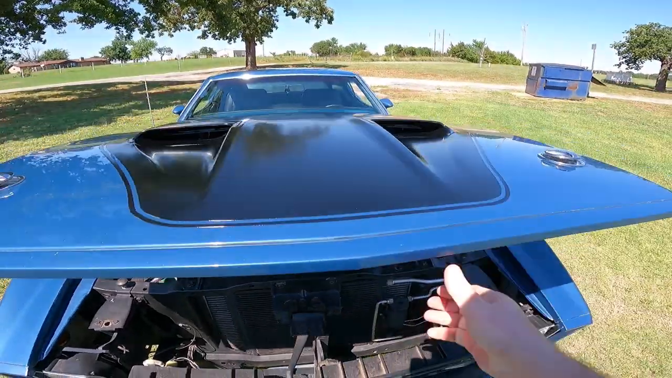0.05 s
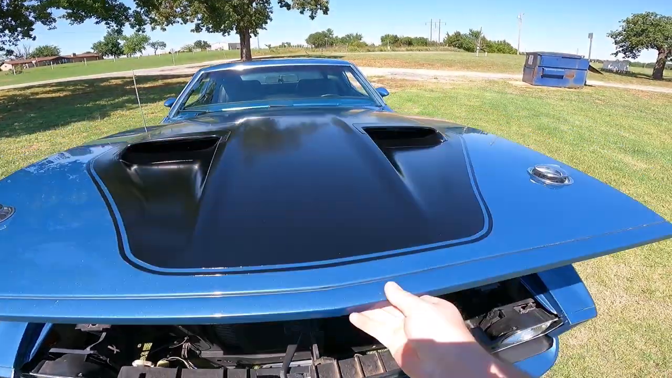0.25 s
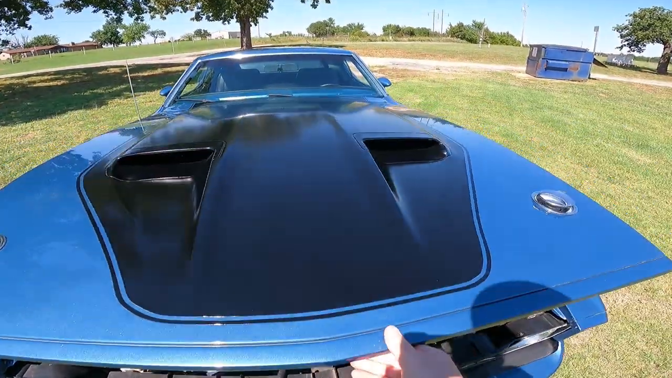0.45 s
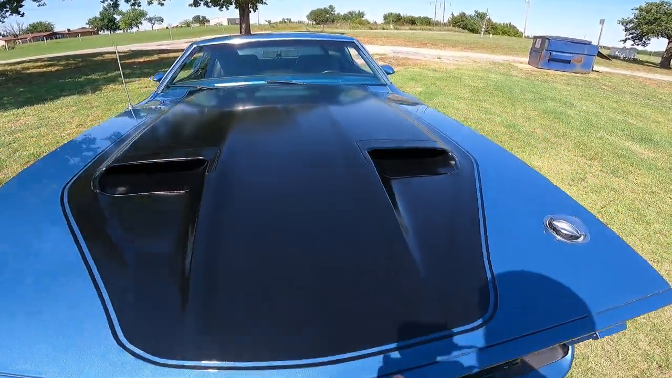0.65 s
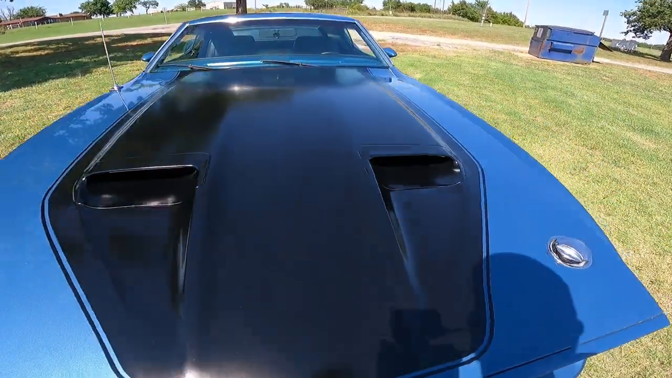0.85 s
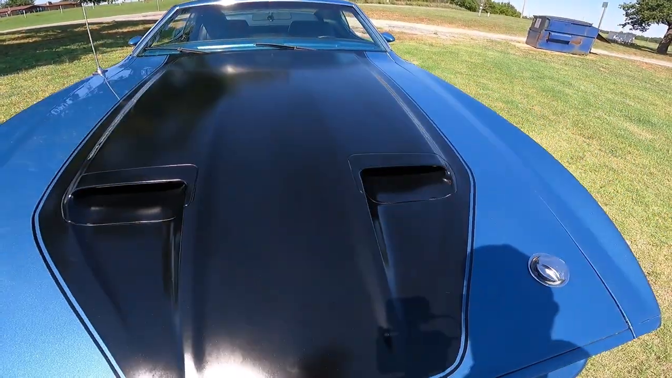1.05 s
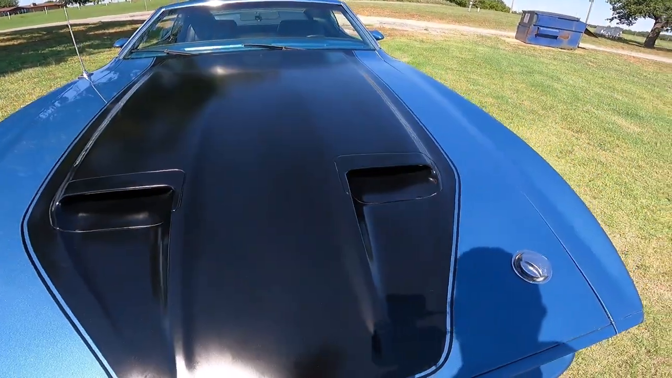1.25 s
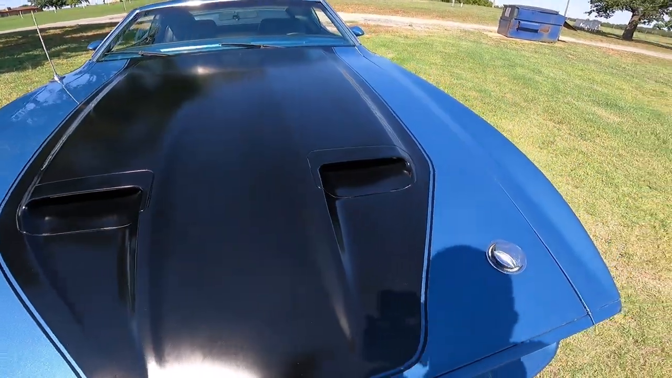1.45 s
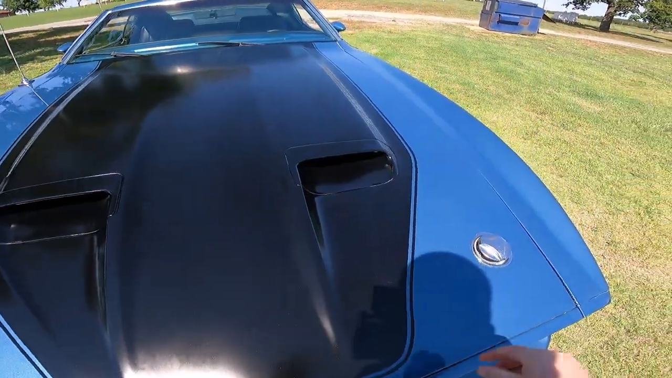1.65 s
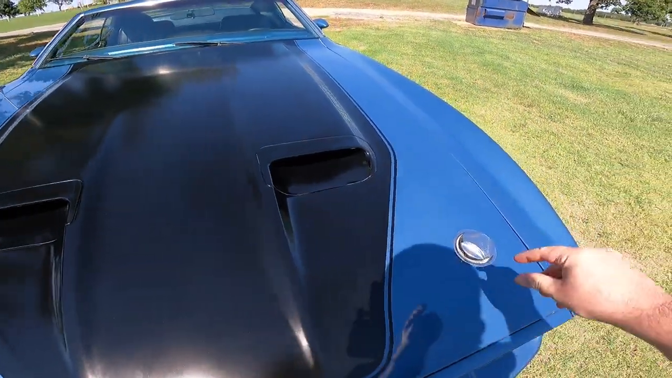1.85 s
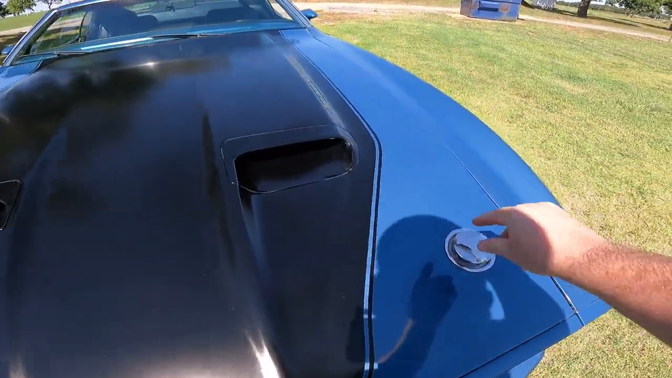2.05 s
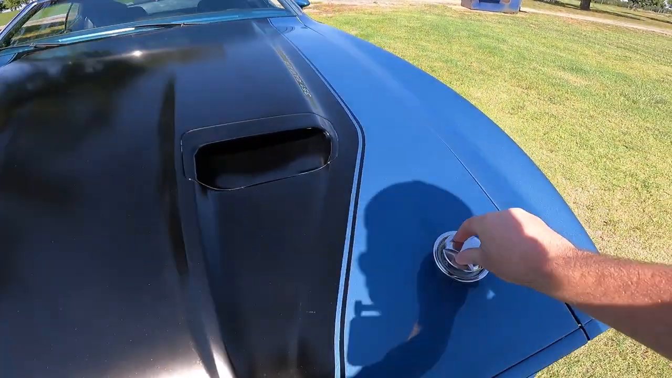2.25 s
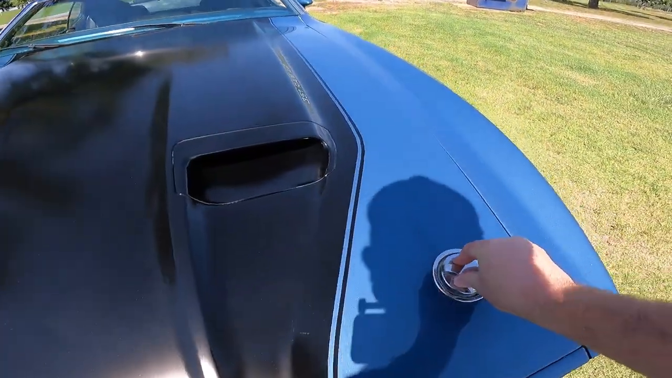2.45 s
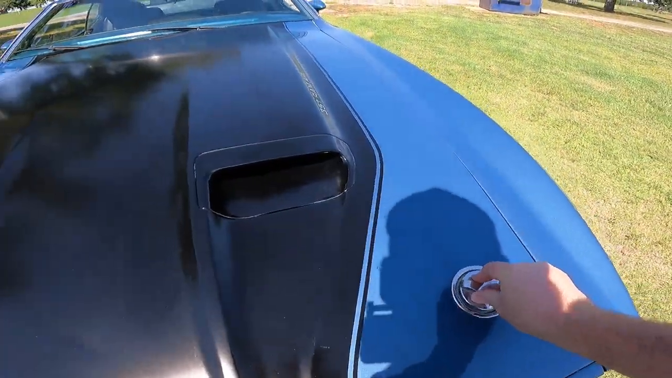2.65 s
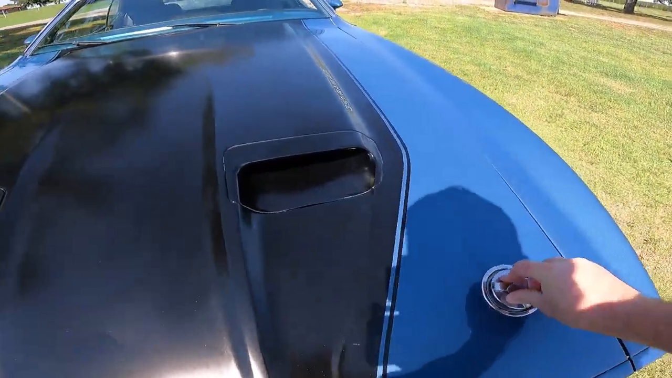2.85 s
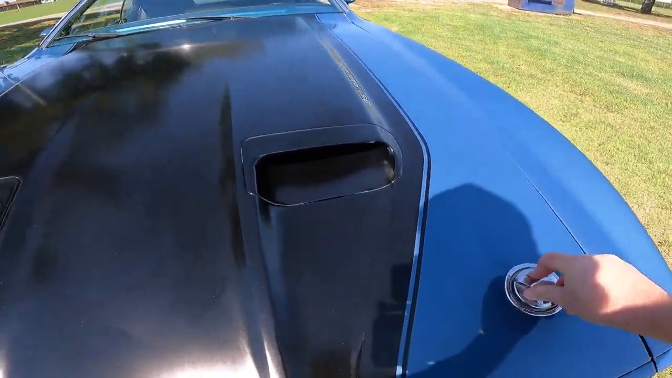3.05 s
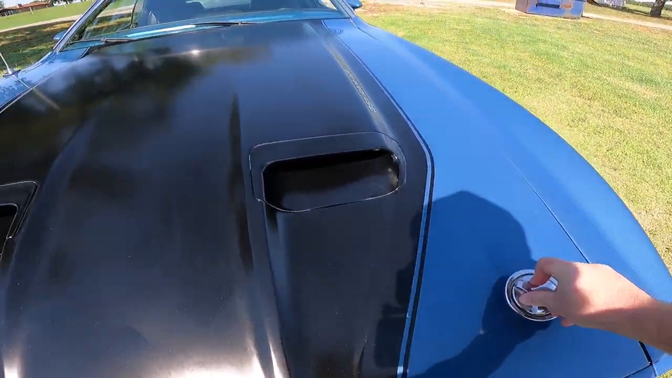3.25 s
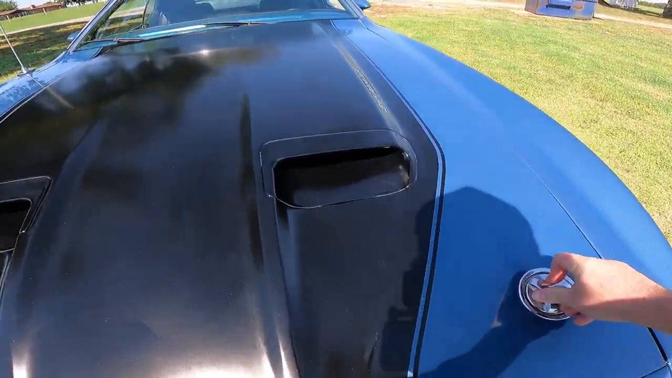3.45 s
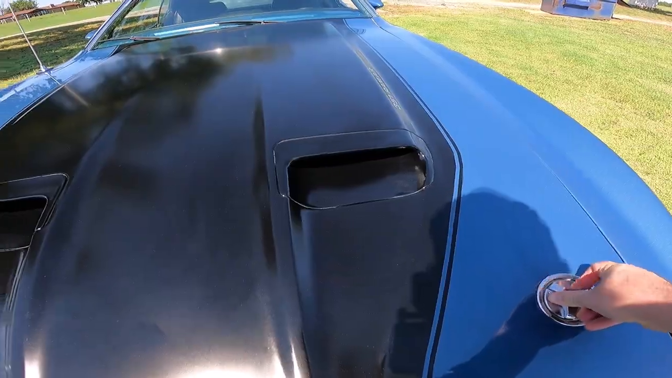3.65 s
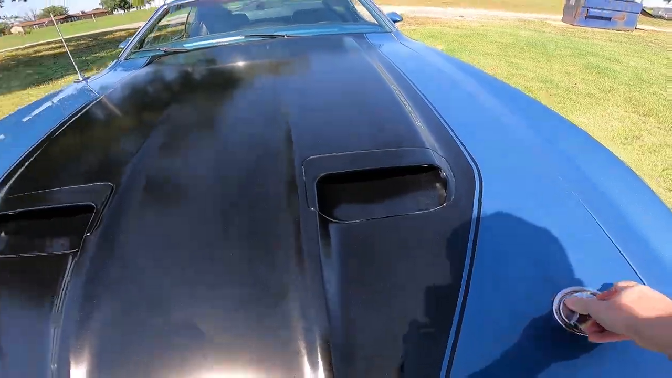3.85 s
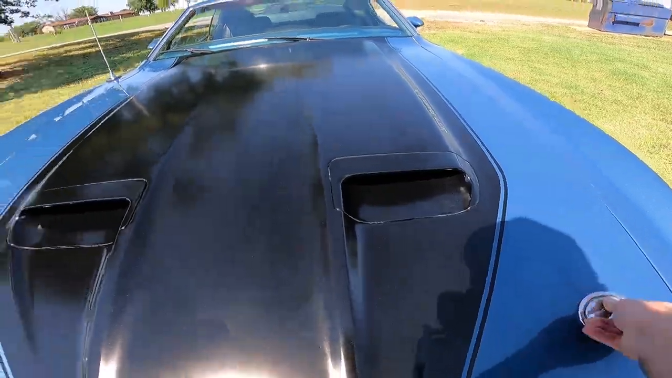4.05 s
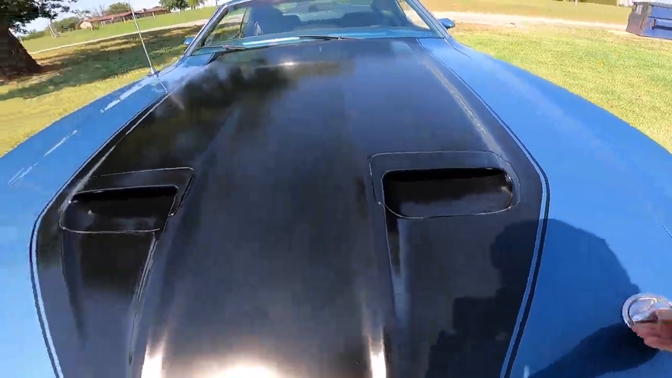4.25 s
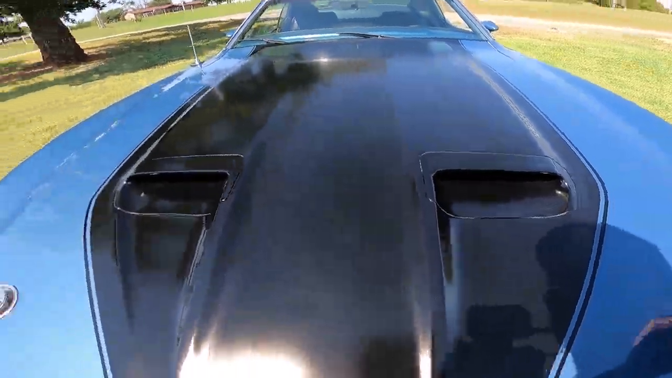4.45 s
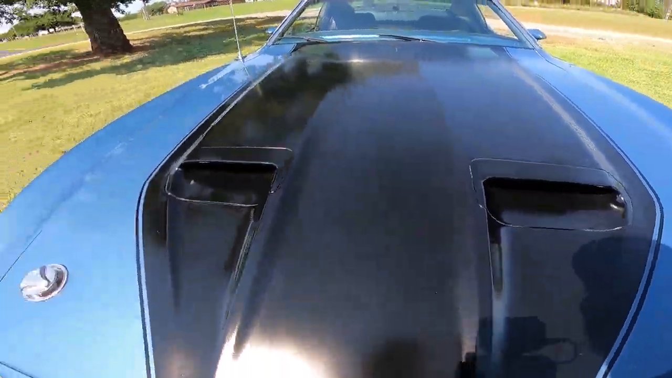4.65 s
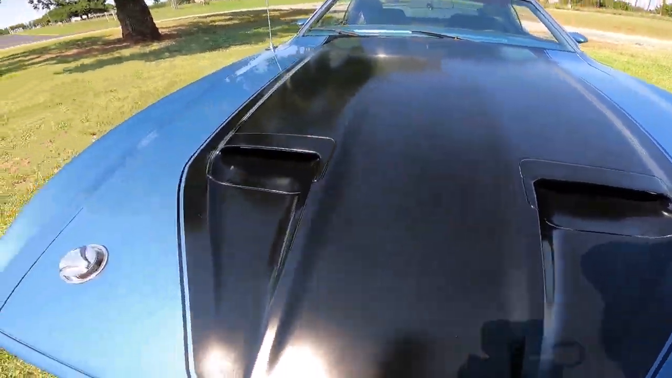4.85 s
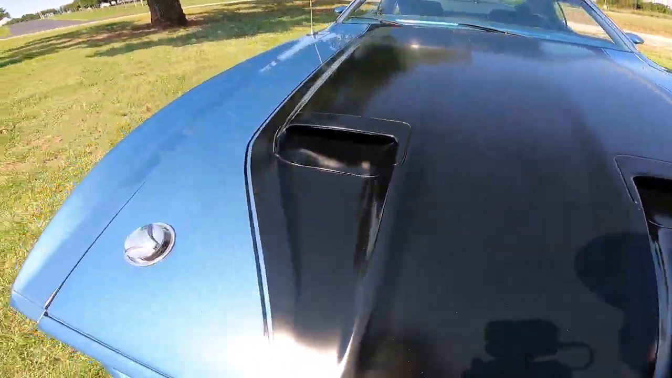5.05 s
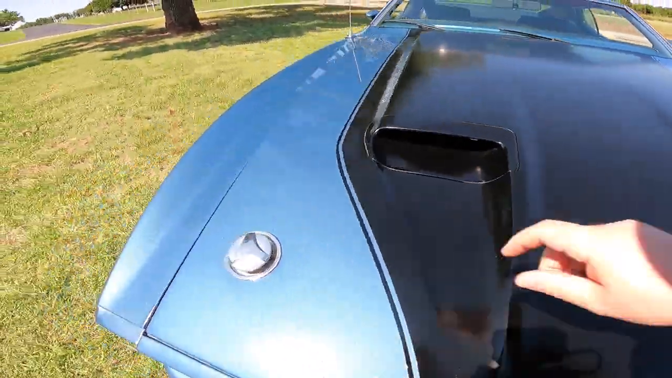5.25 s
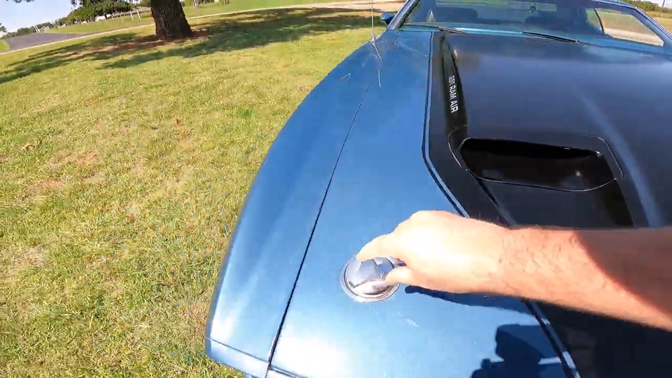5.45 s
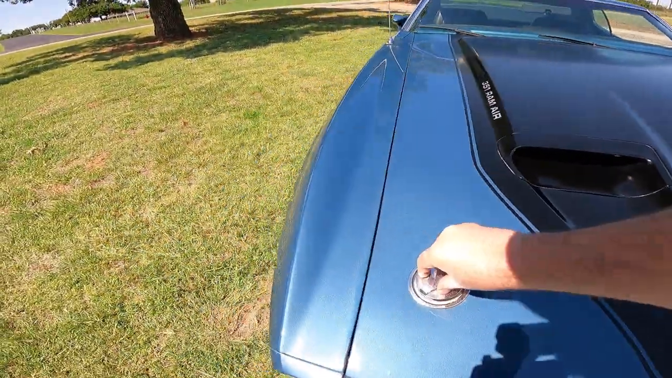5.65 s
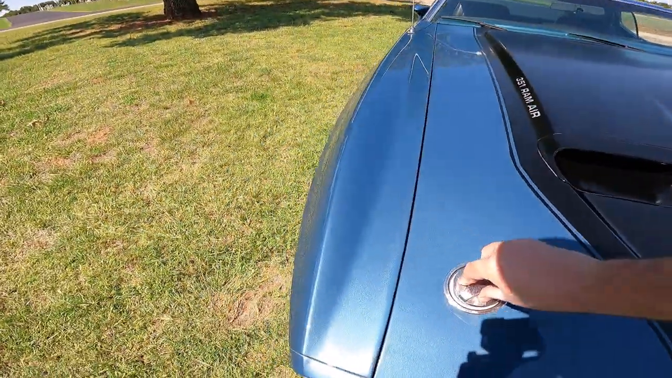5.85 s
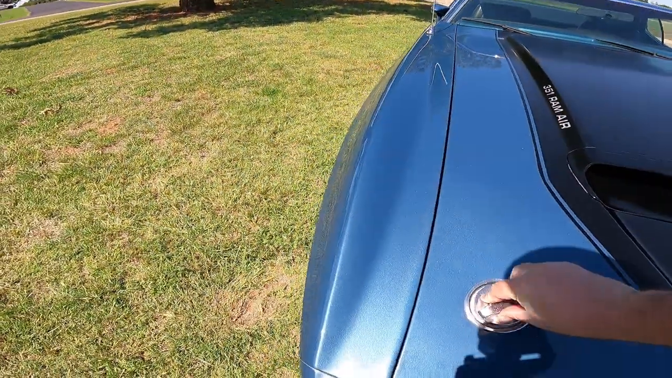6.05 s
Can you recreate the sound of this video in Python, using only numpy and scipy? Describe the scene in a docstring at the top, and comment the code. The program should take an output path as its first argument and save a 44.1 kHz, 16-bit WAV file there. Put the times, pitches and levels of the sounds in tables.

```python
"""Car hood slam and pins in the wind

A steel car hood drops shut outdoors: a thud on its rubber stops (soft low cycles), then latch and panels
clatter (struck-plate noise plus damped modes). Fingers work the metal hood pins before and after: they
click, knock, scrape (random slips through sheet-metal resonances) and squeak (a gliding tone).
Wind buffets the microphone throughout (shaped noise), over a faint outdoor hiss."""
import sys
import numpy as np
from scipy import signal
from scipy.fft import rfft, irfft, next_fast_len
from scipy.io import wavfile

SR = 44100
rng = np.random.default_rng(int(sys.argv[2]) if len(sys.argv) > 2 else 0)


def output_pcm(signal):
    """Save a mono or channel-first signal as 16-bit PCM at the path in sys.argv[1].

    Samples are clipped to [-1, 1] before scaling.
    """
    pcm = np.clip(np.atleast_2d(signal).T, -1, 1) * 32767
    wavfile.write(sys.argv[1], SR, np.round(pcm).astype(np.int16))


N = 269495

# the hood bumps on its rubber stops, as it lands and when a hand presses on it:
# start_s [s], level_db [dB], pitch_hz [Hz], swell_s [s]
THUDS = [(1.0752, -2, 305, 0.0042), (1.079, -22, 726, 0.0053), (1.0885, -16, 88, 0.023),
         (1.1215, -5, 277, 0.0025), (1.171, -12, 116, 0.0034), (3.605, -15, 303.5, 0.0082),
         (6.028, -18.5, 198, 0.0079)]
# spectrum of the sheet metal around a pin: freq_hz [Hz], relative density_db [dB per Hz]
SHEET = [(100, -10.5), (300, 2), (600, -2), (1100, -2.5), (1900, -5.5), (2700, -8.5), (4000, -7.5),
         (6000, -12), (9000, -16), (15000, -35.5)]
# how long that sheet metal rings: freq_hz [Hz], t60_s [s]
SHEET_T60 = [(300, 0.49), (1000, 0.34), (2000, 0.23), (4000, 0.15), (8000, 0.1), (14000, 0.15)]
# its separate modes: freq_hz [Hz], relative level_db [dB], t60_s [s]
SHEET_MODES = [(360, -5, 0.78), (615, -15, 0.3), (970, -14, 0.022), (1118, -4.5, 0.25), (1390, -16, 0.15),
               (1475, -10, 0.15), (1620, -11, 0.24), (1923, -6.5, 0.13), (2230, -14, 0.26),
               (2520, -11, 0.12), (3550, -10.5, 0.16), (3980, -22, 0.068), (5200, -7.5, 0.078),
               (7800, -17.5, 0.055)]


def gain_of(db):
    """Decibels to amplitude."""
    return 10 ** (np.asarray(db) / 20)


def evened(x):
    """Scales to rms 1."""
    return x / np.sqrt(np.mean(x ** 2) + 1e-20)


def read(points, hz):
    """Reads a (Hz, value) table on a log-frequency axis."""
    table_hz, value = np.transpose(points)
    return np.interp(np.log(hz + 1), np.log(table_hz + 1), value)


def add(mix, start_s, sound):
    """Mixes a sound in at its start time."""
    part = mix[max(round(start_s * SR), 0):][:len(sound)]
    part += sound[:len(part)]


def coloured(x, spectrum):
    """Gives x a spectrum, at rms 1."""
    size = next_fast_len(len(x))
    hz = np.fft.rfftfreq(size, 1 / SR)
    shaped = irfft(rfft(x, size) * gain_of(read(spectrum, hz)), size)
    return evened(shaped[:len(x)])


def wander(size, rate):
    """A random curve of rms 1 that changes about rate times a second."""
    at = np.arange(size) * rate / SR
    return evened(np.interp(at, np.arange(size), rng.standard_normal(size)))


def dulled(hz, corner_hz):
    """A softer contact loses the treble above its corner."""
    return 1 / np.sqrt(1 + (hz / corner_hz) ** 4)


def ring(modes, t):
    """Damped sines; each blow lands elsewhere and so weights them a little differently."""
    spread_db = 1.5
    out = np.zeros(len(t))
    for hz, db, t60 in modes:
        decay = gain_of(db + rng.normal(0, spread_db) - 60 * t / t60)
        out += decay * np.sin(2 * np.pi * (hz * t + rng.random()))
    return out


def plate(spectrum, decays, bass_db, corner_hz, size=32768, cluster_db=6.0, cluster_hz=130):
    """Struck sheet metal: dense modes that crowd into clusters, each octave dying at its own speed."""
    hz, t = np.fft.rfftfreq(size, 1 / SR), np.arange(size) / SR
    clusters = np.interp(hz / cluster_hz, np.arange(size), rng.standard_normal(size))
    clusters *= hz / (hz + 400)  # the lows stay smoother
    shape_db = read(spectrum, hz) + cluster_db * clusters + bass_db / (1 + (hz / 550) ** 2)
    shape = gain_of(shape_db) * dulled(hz, corner_hz)
    struck = rfft(rng.standard_normal(size)) * evened(shape)
    octave = np.log2(np.clip(hz, 2 ** 6, 2 ** 14))
    out = np.zeros(size)
    for k in range(6, 15):
        band = irfft(struck * np.maximum(1 - abs(octave - k), 0))  # neighbouring octaves crossfade
        out += band * gain_of(-60 * t / read(decays, 2 ** k))
    return out


def pushes(rows):
    """Soft blows: a few low cycles that swell and die."""
    out, t = np.zeros(N), np.arange(SR // 4) / SR
    for start_s, db, hz, swell_s in rows:
        envelope = t / swell_s * np.exp(1 - t / swell_s)
        add(out, start_s, gain_of(db) * envelope * -np.cos(2 * np.pi * hz * t))
    return out


def wind(rumble_db=1, flutter_db=-37.5, flutter_follows=0.88, rasp_db=-14, lumpy_db=2.5,
         eddies_per_s=70, swell_rumble=0.14):
    """Large eddies rumble on the microphone; small ones flutter in lumps, and only the fastest rasp."""
    # strength of the wind at the microphone: time_s [s], relative level_db [dB]
    strength = [(0.0, -29), (0.55, -39), (0.8, -28.5), (1.03, -33.5), (1.62, -35.5), (1.87, -27.5),
                (2.1, -28.5), (2.36, -37.5), (2.56, -34.5), (2.66, -25), (2.82, -21.5), (3.05, -23.5),
                (3.62, -26), (3.83, -33), (3.97, -28), (5.15, -21.5), (5.87, -27.5), (6.04, -21.5)]
    # short swells of low flutter, from gusts or the hood's low ringing, and lulls:
    # middle_s [s], length_s [s], flutter_change_db [dB]
    flutter_swells = [(1.851, 0.033, 7), (2.634, 0.065, 11), (2.872, 0.076, 8.5), (3.272, 0.34, 11.5),
                      (3.46, 0.096, 8.5), (3.701, 0.23, 13), (3.99, 0.13, 12.5), (4.137, 0.14, 10),
                      (4.24, 0.064, -3), (4.477, 0.1, 5.5), (4.799, .14, 13), (4.927, 0.057, -14),
                      (5.0, 0.081, 10.5), (5.331, 0.078, 8.5), (5.63, 0.061, -12), (5.714, 0.11, 9)]
    # the strongest single buffets: start_s [s], level_db [dB], pitch_hz [Hz]
    buffet_rows = [(.777, -28.5, 195), (2.036, -20.5, 153), (2.791, -21, 325), (3.188, -22, 417),
                   (3.222, -16.5, 240), (4.706, -15.5, 220), (4.997, -15, 288), (5.181, -25, 337),
                   (5.687, -26, 340), (5.729, -20, 334)]
    # spectra of slow rumble, quicker flutter and fastest eddies: freq_hz [Hz], relative density_db [dB per Hz]
    rumble_colour = [(8, -3.5), (25, 7.5), (45, 8.5), (80, 5.5), (120, 2.5), (180, -16.5), (400, -64.5),
                     (2000, -100)]
    flutter_colour = [(70, -8), (135, 0), (200, -5), (300, -11), (420, -23), (600, -38), (1000, -44),
                      (5000, -90.5)]
    rasp_colour = [(100, -12.5), (300, 0), (420, -6), (600, -9.5), (1000, -15.5), (2000, -39.5),
                   (10000, -96)]
    swell_cycles = 1 / 3  # each buffet swells for this share of one cycle

    t = np.arange(N) / SR
    strength_db = np.interp(t, *np.transpose(strength))
    swell_db = sum(db * np.exp(-(2 * (t - middle_s) / length_s) ** 2)
                   for middle_s, length_s, db in flutter_swells)
    eddies = gain_of(lumpy_db * np.minimum(wander(N, eddies_per_s), 2))

    rumble = coloured(rng.standard_normal(N), rumble_colour)
    rumble *= gain_of(rumble_db + strength_db + swell_rumble * swell_db)

    flutter = coloured(rng.standard_normal(N) * eddies, flutter_colour)
    rasp = coloured(rng.standard_normal(N) * eddies ** 2, rasp_colour)
    follow_db = flutter_follows * (strength_db - strength_db.mean())
    turbulence = (flutter + gain_of(rasp_db) * rasp) * gain_of(flutter_db + follow_db + swell_db)

    buffets = pushes([(start_s, db, hz, swell_cycles / hz) for start_s, db, hz in buffet_rows])
    return rumble + turbulence + buffets


def hiss(start_db=-55.5, rise_db_per_s=0.98, dip_depth_db=10.5, sink_s=0.26, recovery_s=1.33):
    """Faint hiss of the open air and far trees; it sinks from the slam on, then creeps back."""
    # spectrum of the hiss: freq_hz [Hz], relative density_db [dB per Hz]
    hiss_colour = [(150, -2), (500, -3.5), (1100, -3.5), (1400, -6), (3400, -10.5), (7000, -17),
                   (10300, -29.5), (11500, -40), (15500, -50.5)]
    t = np.arange(N) / SR
    since = np.maximum(t - THUDS[0][0], 0)  # seconds since the first thud
    dip_db = dip_depth_db * (1 - np.exp(-since / sink_s)) * np.exp(-(since / recovery_s) ** 3)
    waver_db = .7 * wander(N, 19)
    level_db = start_db + rise_db_per_s * t - dip_db + waver_db
    return gain_of(level_db) * coloured(rng.standard_normal(N), hiss_colour)


def lead_in(db, bass_db, corner_hz, size=1024):
    """A faint burst of sheet-metal noise that swells up to a contact."""
    noise = plate(SHEET, SHEET_T60, bass_db, corner_hz, size=size)
    return gain_of(db) * evened(noise) * np.linspace(0, 1, size)


def tap(db, bass_db, corner_hz, crack_db, own_mode, rise_s, modes_db=-6, crack_s=0.00095):
    """One contact on a pin: a sharp crack, the part's own ring, and the sheet metal around it."""
    sheet = plate(SHEET, SHEET_T60, bass_db, corner_hz, size=16384, cluster_db=1.0, cluster_hz=173.6)
    t = np.arange(len(sheet)) / SR
    # a soft contact excites the high modes less
    modes = [(hz, level + 20 * np.log10(dulled(hz, corner_hz)), t60) for hz, level, t60 in SHEET_MODES]
    cracked = sheet * (1 + 2 * gain_of(crack_db) * np.exp(-t / crack_s))
    click = cracked + gain_of(modes_db) * ring(modes, t) + ring([own_mode], t)
    return gain_of(db) * click * (1 - np.exp(-t / rise_s))


def snaps(level_db=-3.0, lead_db=-13, rise_s=0.00079, count=2):
    """A pin or fitting seats with a crack, and bounces, weaker and duller each time."""
    # snaps into the seat: start_s [s], relative level_db [dB], bass_db [dB], dull_above_hz [Hz],
    # relative crack_db [dB], own_ring_hz [Hz], relative own_ring_db [dB], own_t60_s [s],
    # bounce_gap_s [s], bounce_step_db [dB per bounce], bounce_ring_hz [Hz]
    snap_rows = [(.009, -35.5, -5, 12000, -21, 3850, -4.5, 0.15, .01, -6.5, 1006),
                 (2.507, -28.5, 2.5, 2970, -14, 2190, 7.5, 0.02, .007, -1, 1750),
                 (2.94, -45, -2, 14000, -12, 4970, -4, .08, .01, -7, 1440),
                 (3.300, -19, -3, 5670, 5.5, 2980, -13, .05, 0.0052, -11, 2400),
                 (3.308, -20, 2, 5960, 12, 7750, -2, 0.034, .012, -2, 1440),
                 (3.6035, -20.5, 5, 5950, 14, 1816, 19.5, 0.016, .008, -5.5, 1100),
                 (4.336, -32.5, 7, 4060, -4, 4880, -1, 0.053, .01, -8, 1376),
                 (4.789, -26, 5, 10000, -4, 6250, -0.5, 0.031, .013, -2.5, 1100),
                 (5.9426, -25.5, -6, 4500, 6.5, 2290, 6.5, .04, 0.0044, -8, 5280),
                 (5.953, -25, -7, 2270, 5.5, 1170, 9, 0.16, 0.011, -7, 1906)]
    dulling = 0.62  # share of the treble corner kept at each bounce
    bounce_crack_db, bounce_ring_db, bounce_t60 = -13, 3, 0.088
    out = np.zeros(N)
    for (start_s, db, bass_db, corner_hz, crack_db, own_hz, own_db, own_t60,
         gap_s, step_db, bounce_hz) in snap_rows:
        lead = lead_in(db + lead_db, bass_db, corner_hz)
        add(out, start_s - len(lead) / SR, lead)
        own_mode = (own_hz, own_db, own_t60)
        add(out, start_s, tap(db, bass_db, corner_hz, crack_db, own_mode, rise_s))
        for k in range(1, count + 1):
            mode = (bounce_hz, bounce_ring_db, bounce_t60)
            corner = corner_hz * dulling ** k
            bounce = tap(db + k * step_db, bass_db, corner, bounce_crack_db, mode, rise_s)
            add(out, start_s + k * gap_s, bounce)
    return gain_of(level_db) * out


def knocks(level_db=-3.0, lead_db=-14, ring_db=4, ring_t60=0.075, crack_db=-12, rise_s=0.0022):
    """Fingers fumble with a pin: soft, dull contacts of its plate on the hood."""
    # knocks: start_s [s], relative level_db [dB], bass_db [dB], dull_above_hz [Hz], ring_hz [Hz]
    knock_rows = [(.298, -24.5, 10.5, 4000, 860), (2.329, -31.5, 15, 1000, 710),
                  (2.381, -25.5, 12.5, 1060, 717), (2.453, -25.5, 7, 1090, 826),
                  (2.467, -27, 7.5, 2250, 1060), (2.984, -27.5, 2, 1390, 1267),
                  (6.026, -22.5, 9, 2160, 530)]
    out = np.zeros(N)
    for start_s, db, bass_db, corner_hz, ring_hz in knock_rows:
        lead = lead_in(db + lead_db, bass_db, corner_hz)
        add(out, start_s - len(lead) / SR, lead)
        own_mode = (ring_hz, ring_db, ring_t60)
        add(out, start_s, tap(db, bass_db, corner_hz, crack_db, own_mode, rise_s))
    return gain_of(level_db) * out


def scrapes(slips_per_s=6000, chatter_db=11, chatter_width_hz=220, uneven_db=2):
    """Short scrapes: tiny, uneven slips drive the sheet metal and one further resonance."""
    # short scraping sounds:
    # start_s [s], end_s [s], level_db [dB], chatter_hz [Hz], dull_above_hz [Hz]
    scrape_rows = [(1.053, 1.085, -37.5, 1760, 9000), (3.282, 3.335, -29.5, 2700, 7000),
                   (3.581, 3.632, -26.5, 3900, 4500), (3.856, 4.077, -40, 1140, 1900),
                   (3.857, 4.028, -41.5, 3270, 3350), (3.919, 4.144, -36.5, 3100, 10900),
                   (4.032, 4.141, -32, 760, 5500), (4.104, 4.211, -43, 2010, 3520)]
    out = np.zeros(N)
    for start_s, end_s, db, chatter_hz, corner_hz in scrape_rows:
        size = max(round((end_s - start_s) * SR), 64)
        hz = np.fft.rfftfreq(size, 1 / SR)
        slips = rng.standard_normal(SR) * (rng.random(SR) < slips_per_s / SR)
        slips *= gain_of(uneven_db * wander(SR, 89))
        colour_db = read(SHEET, hz) + chatter_db / (1 + ((hz - chatter_hz) / chatter_width_hz) ** 2)
        colour_db += sum(5 / (1 + ((hz - mode[0]) / 45) ** 2) for mode in SHEET_MODES)
        scrape = irfft(rfft(slips[:size]) * gain_of(colour_db) * dulled(hz, corner_hz), size)
        add(out, start_s, gain_of(db) * evened(scrape) * signal.windows.tukey(size, .6))
    return out


def blows(count=5):
    """The main blows, followed by the ever weaker rebounds as the hood rattles to rest."""
    # blows of latch and panels: start_s [s], relative level_db [dB], bass_db [dB], dull_above_hz [Hz]
    main_blows = [(1.072, -15.5, 4.5, 6700), (1.093, -20, -23, 2520), (1.103, -15.5, -24, 6440),
                  (1.111, -14.5, -35, 5860), (1.124, -13, 2, 3500), (1.140, -13.5, -8.5, 6000),
                  (1.150, -12, -2.5, 5760), (1.163, -13, 10, 4200)]
    settle_start_s, settle_gap_s = 1.19, 0.021
    settle_db, settle_db_per_s, settle_bass_db, settle_dull_hz = -24, -190, -2, 3230
    rebounds = []
    for after_s in np.arange(count) * settle_gap_s:
        db = settle_db + settle_db_per_s * after_s
        rebounds.append((settle_start_s + after_s, db, settle_bass_db, settle_dull_hz))
    return main_blows + rebounds


def slam(clatter_db=-1.5, modes_db=-13, crack_db=1, crack_s=0.0013, rise_s=0.0032):
    """Latch and panel edges crack and set the whole hood ringing, over thuds on the rubber stops."""
    # the hood's crowd of overlapping modes: freq_hz [Hz], relative density_db [dB per Hz]
    panel_colour = [(30, -15), (70, 6), (170, 3), (310, 8), (500, -3), (1000, -6.5), (1700, -9),
                    (2500, -11), (4000, -11.5), (6000, -18.5), (9000, -23.5), (15000, -29)]
    # how long that crowd rings: freq_hz [Hz], t60_s [s]
    panel_t60 = [(80, 0.77), (300, 0.41), (900, 0.34), (2000, 0.22), (4000, 0.11), (8000, 0.19),
                 (14000, 0.11)]
    # separate modes, close ones near 1 kHz beat: freq_hz [Hz], relative level_db [dB], t60_s [s]
    hood_modes = [(79, 11.5, 0.39), (116.1, -2, 0.99), (222, -13, 0.65), (258, -12, 0.15), (298, -9, .4),
                  (340, -4.5, 0.47), (380, 0, 0.43), (458, -5, 0.21), (616, -3.5, 0.36), (802, -12, 0.59),
                  (886, -8, 0.36), (1025, -18, 0.99), (1024, -21, 0.96), (1035, -19, 0.97),
                  (1040, -28, 0.61), (1060, -9, 0.17), (1635, 0, 0.15), (1586, -0.5, 0.16),
                  (1718, -2.5, 0.15), (2420, -7, 0.16), (2400, -7, 0.14), (3380, -15, 0.13),
                  (3925, -1.5, 0.075)]
    clatter = np.zeros(N)
    for start_s, db, bass_db, corner_hz in blows():
        panel = plate(panel_colour, panel_t60, bass_db, corner_hz)
        t = np.arange(len(panel)) / SR
        cracked = panel * (1 + gain_of(crack_db) * np.exp(-t / crack_s))
        blow = cracked + gain_of(modes_db) * ring(hood_modes, t)
        add(clatter, start_s, gain_of(db) * blow * (1 - np.exp(-t / rise_s)))
    return gain_of(clatter_db) * clatter + pushes(THUDS)


def squeak(jitter=0.0018, octave_db=-27):
    """The dry pin squeaks: stick and slip lock onto one high mode, with a faint octave above."""
    # path of the squeak: time_s [s], pitch_hz [Hz], level_db [dB]
    squeak_path = [(4.06, 3930, -57), (4.078, 3890, -35), (4.09, 3760, -39), (4.138, 3966, -33.5),
                   (4.166, 3840, -55), (4.18, 3963, -41.5), (4.21, 3960, -64), (4.22, 3930, -58)]
    time_s, hz, db = np.transpose(squeak_path)
    t = np.arange(N) / SR
    pitch_hz = np.interp(t, time_s, hz) * (1 + jitter * wander(N, 400))
    phase = 2 * np.pi * np.cumsum(pitch_hz) / SR
    level = gain_of(np.interp(t, time_s, db)) * (t > time_s[0]) * (t < time_s[-1])
    tone = np.sin(phase) + gain_of(octave_db) * np.sin(2 * phase)
    return np.sqrt(2) * level * tone  # the root makes the level an rms one


def scene():
    """Everything is close and in the open, so there is no room."""
    mix = wind() + hiss() + snaps() + knocks() + scrapes() + slam() + squeak()
    return mix[None]


def record(dry):
    """The loudest peaks are rounded off and the ends faded; then the treble is cut at the band limit."""
    edge_hz = 15300
    rounded = dry / (1 + (dry / .9) ** 6) ** (1 / 6)
    faded = rounded * signal.windows.tukey(N, .001)
    lowpass = signal.firwin(511, edge_hz, window=("kaiser", 9), fs=SR)
    return signal.oaconvolve(faded, lowpass[None], "same")


dry = scene()
out = record(dry)
output_pcm(out)
```